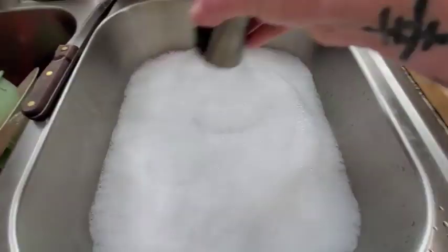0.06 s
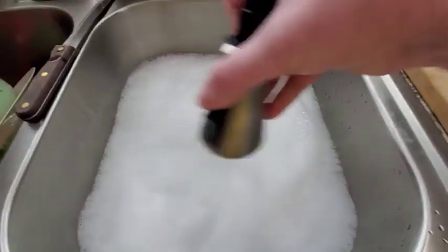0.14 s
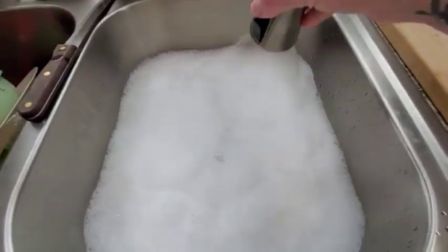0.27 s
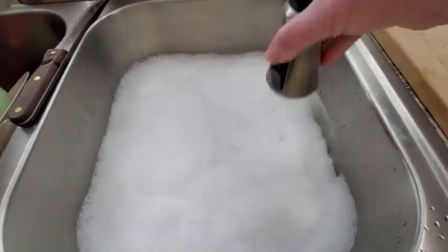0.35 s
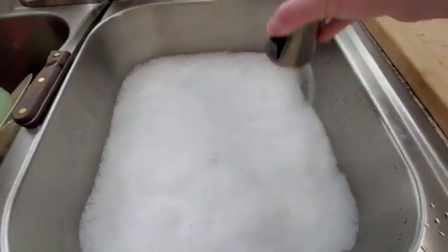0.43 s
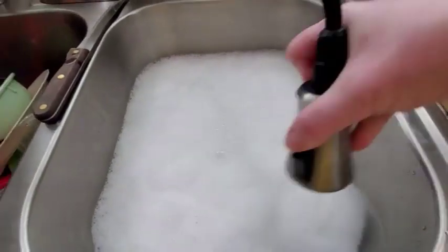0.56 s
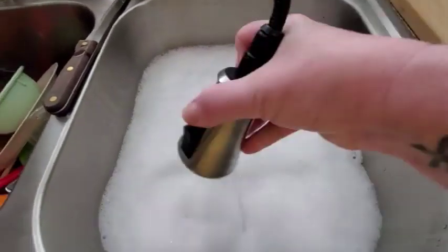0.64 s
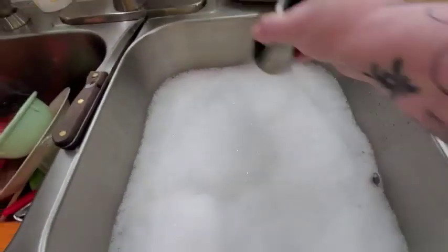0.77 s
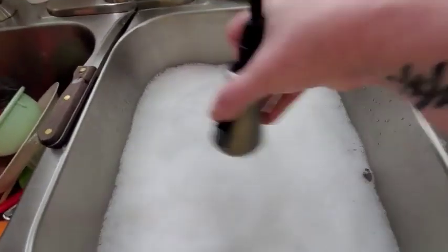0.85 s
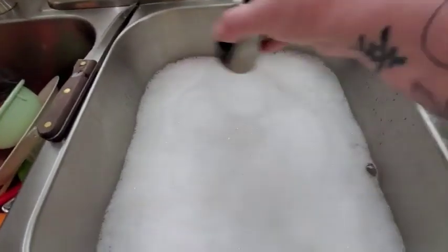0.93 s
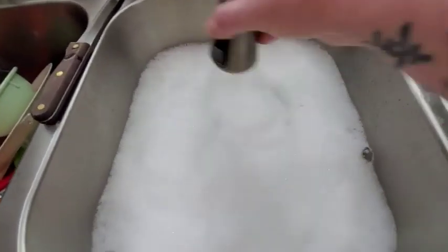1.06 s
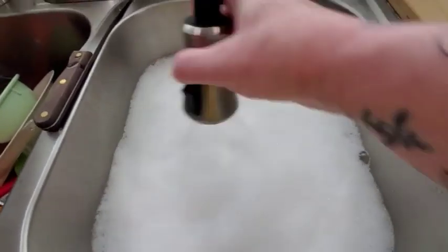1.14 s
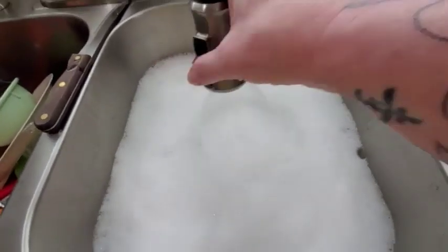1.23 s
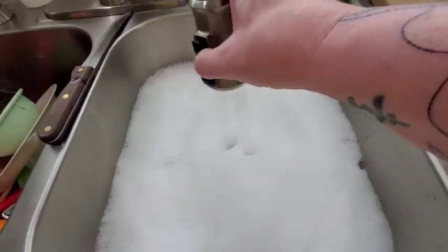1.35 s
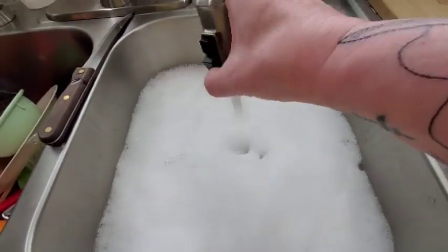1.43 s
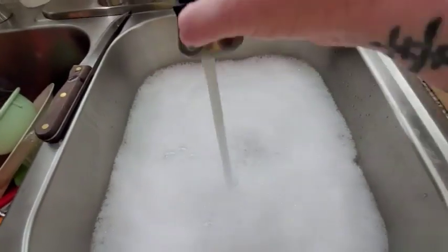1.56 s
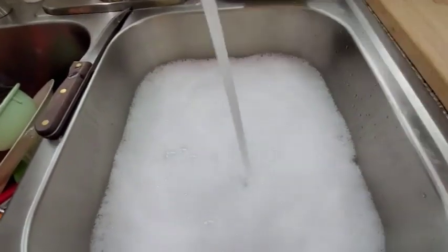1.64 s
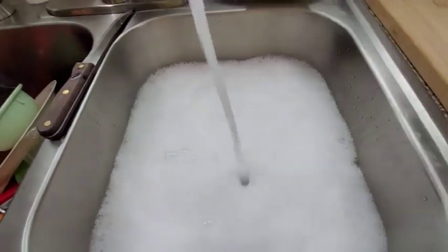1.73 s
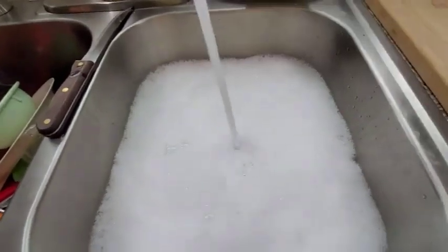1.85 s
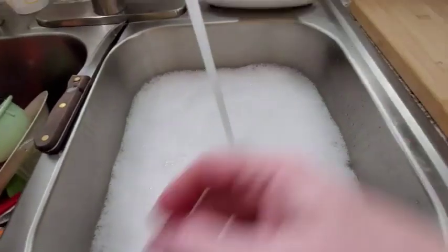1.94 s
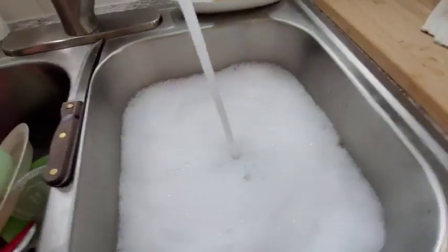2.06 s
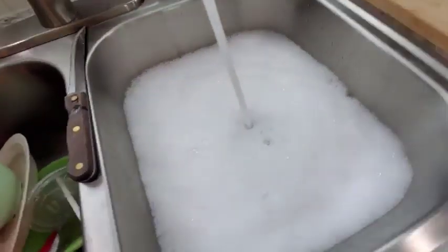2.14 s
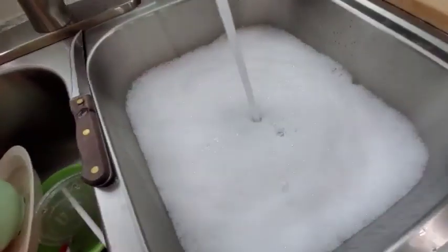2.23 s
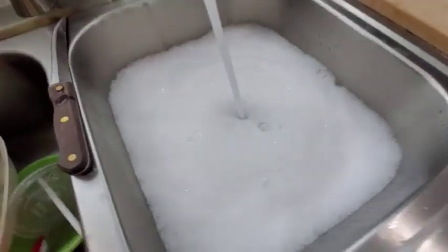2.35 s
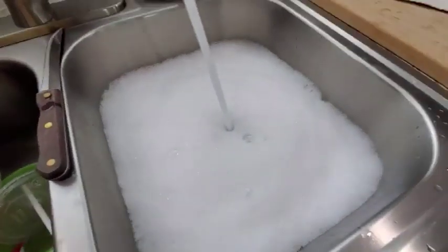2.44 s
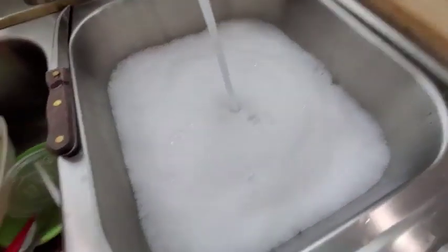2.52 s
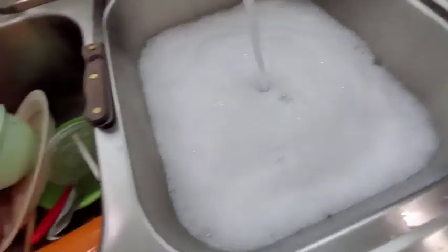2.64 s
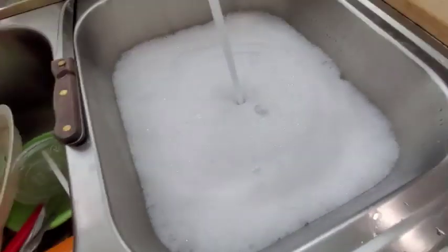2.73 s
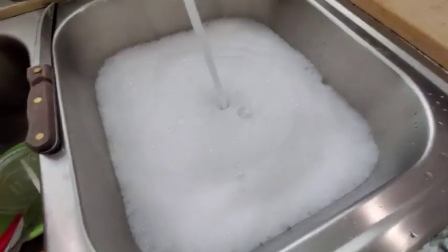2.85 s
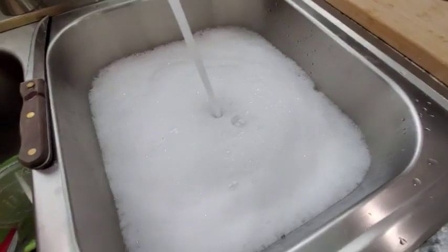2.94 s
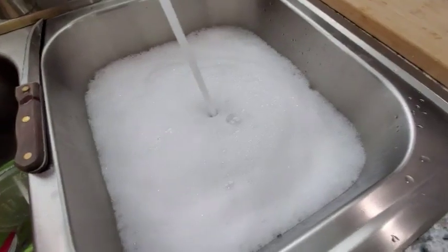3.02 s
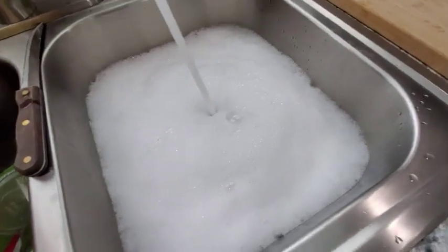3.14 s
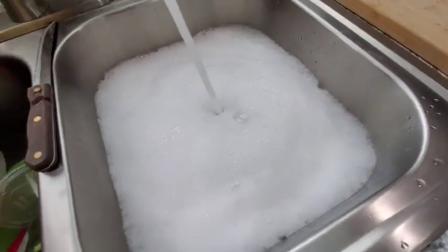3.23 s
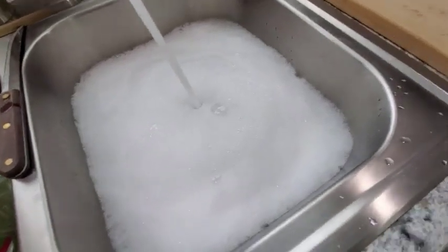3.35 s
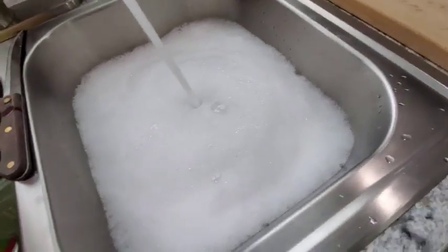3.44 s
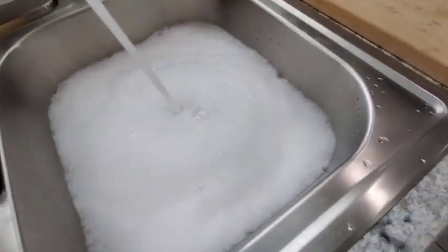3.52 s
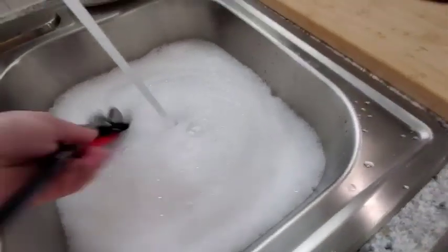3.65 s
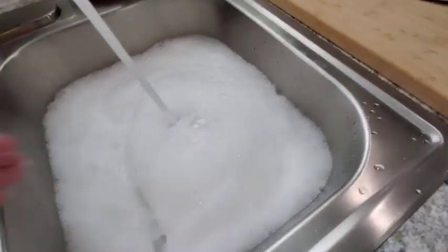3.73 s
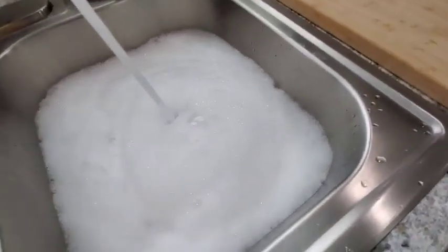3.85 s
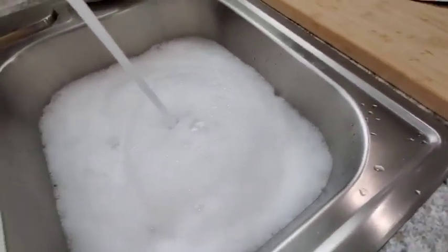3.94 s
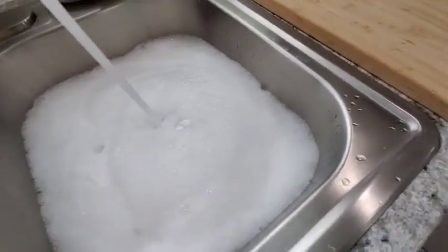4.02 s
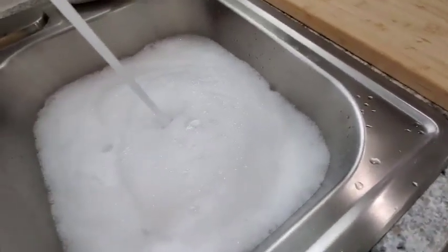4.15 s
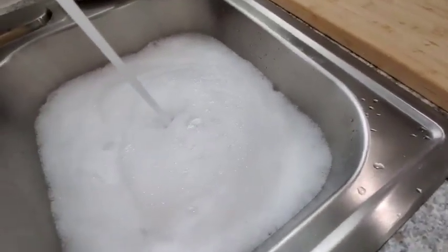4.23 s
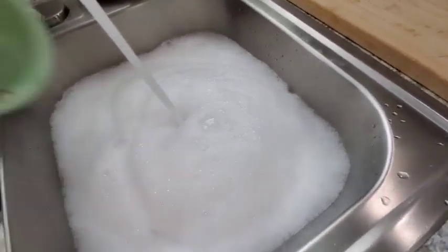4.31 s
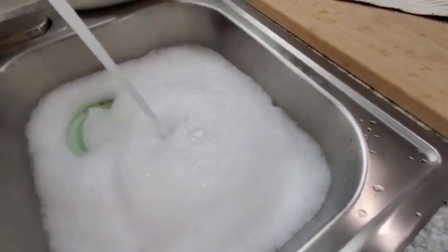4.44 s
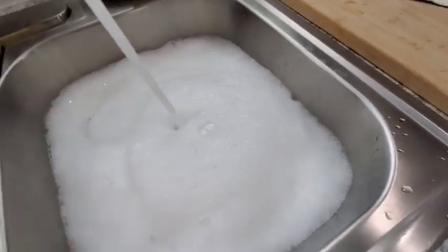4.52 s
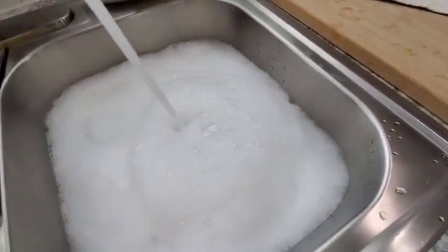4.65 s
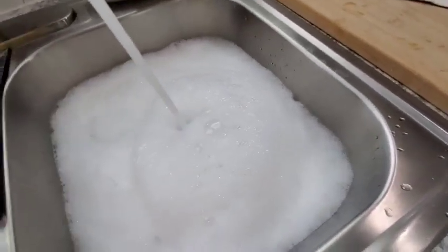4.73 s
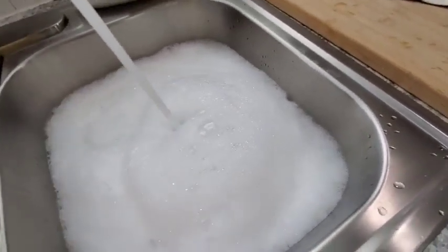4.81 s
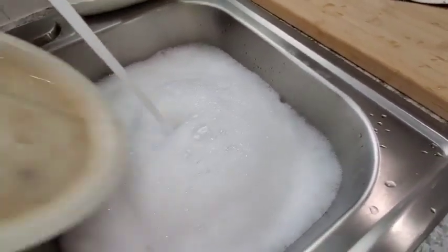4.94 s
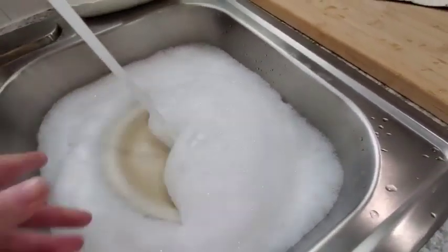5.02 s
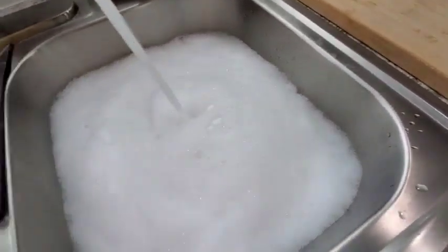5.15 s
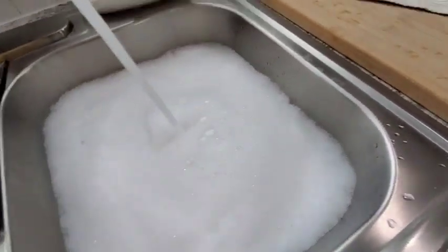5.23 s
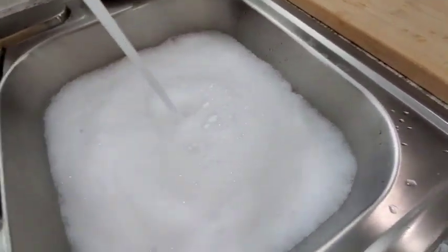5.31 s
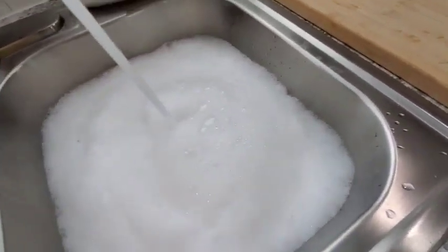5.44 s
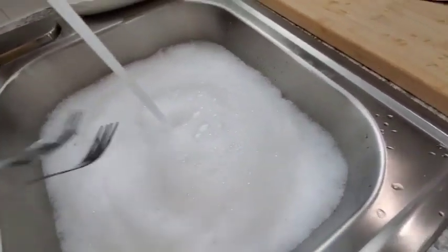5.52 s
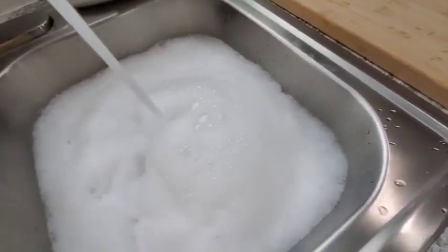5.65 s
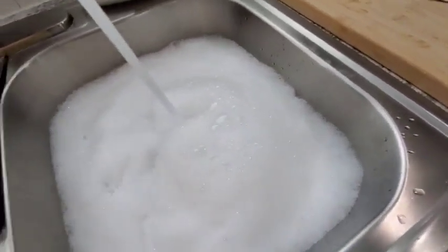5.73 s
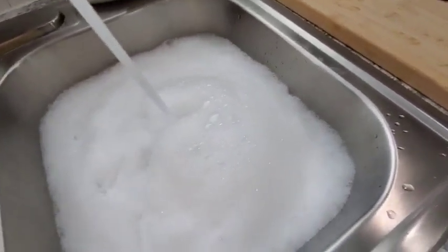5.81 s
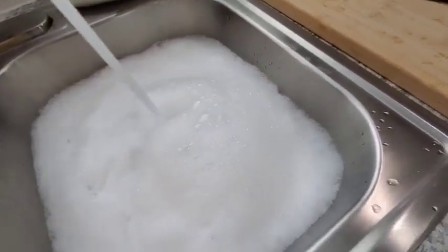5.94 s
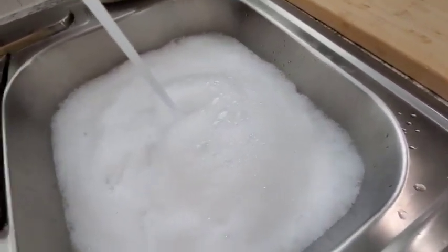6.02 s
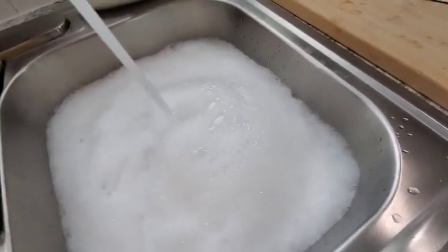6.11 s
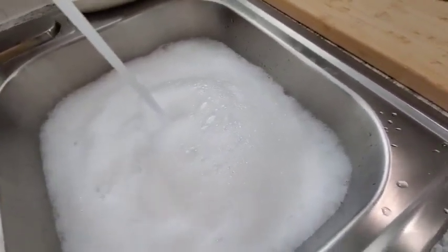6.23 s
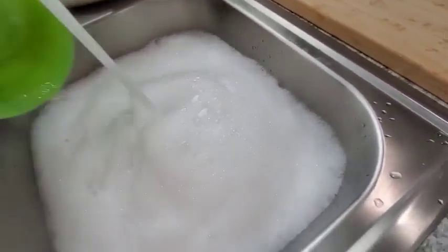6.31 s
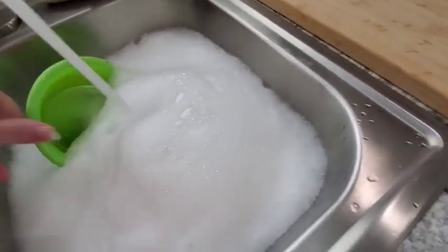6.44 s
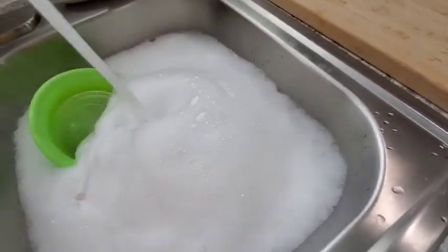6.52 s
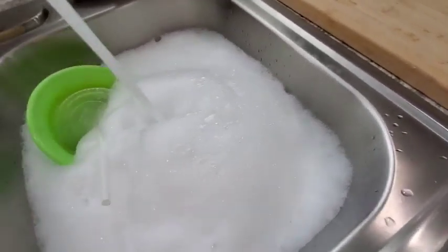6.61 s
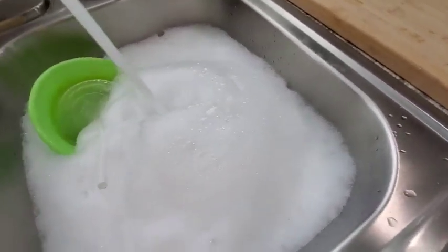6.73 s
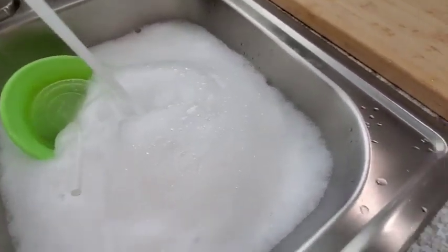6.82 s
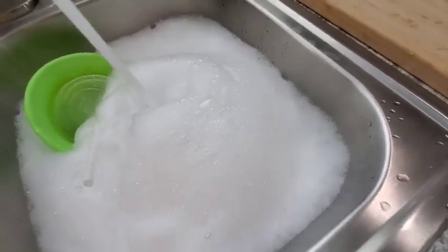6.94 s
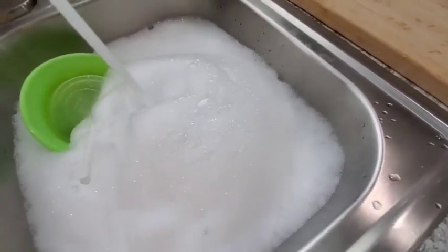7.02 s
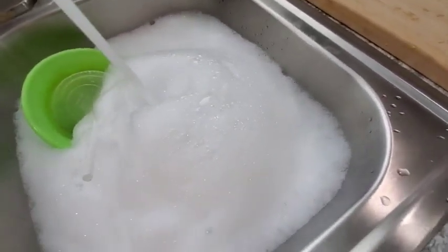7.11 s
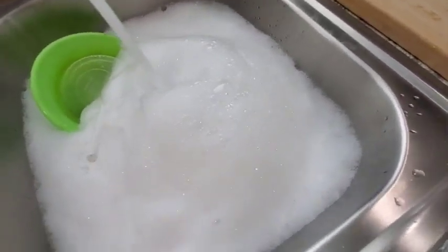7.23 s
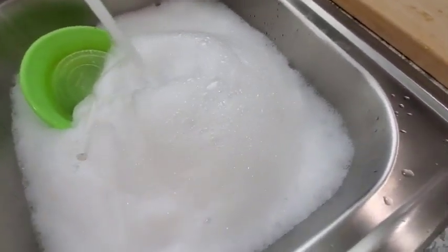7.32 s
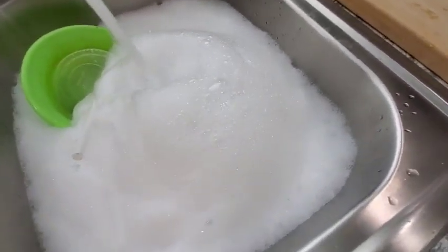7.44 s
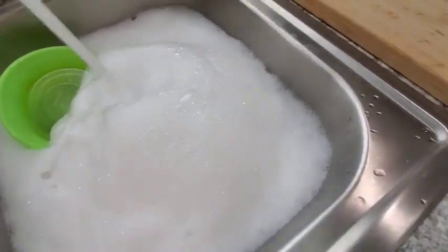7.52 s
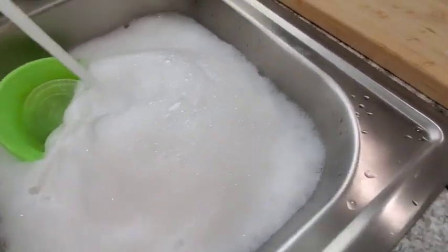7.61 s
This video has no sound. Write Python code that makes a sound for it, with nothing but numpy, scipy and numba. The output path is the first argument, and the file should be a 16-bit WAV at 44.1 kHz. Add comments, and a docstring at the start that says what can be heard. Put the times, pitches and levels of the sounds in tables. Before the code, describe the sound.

Close in a steel kitchen sink, a spray sweeps thick suds with surging hiss and gurgle. The button snaps, the spray head docks with small knocks and a low rumble, and a steady stream hisses and bubbles softly in foam. From about three seconds, dishes clatter, tick and scrape; two heavy hollow thumps come just after five seconds, then lighter plastic-like knocks. A phone held close hears it in stereo.

```python
"""First a spray hisses and gurgles in surges over suds in a steel sink, with a dull plunge under everything.
A button snaps, the spray head docks with a low rumble and a single stream hisses while bubbles ring in foam.
Dishes knock, tick and scrape: knocks are fading tones with a crack, scrapes are trains of tiny clicks.
Coloured noise makes the hisses and the steel bowl hums and booms. A phone close above listens with two ports."""
import sys
import numpy as np
from scipy import signal
from scipy.fft import rfft, irfft, next_fast_len
from scipy.io import wavfile
from scipy.ndimage import uniform_filter1d
from numba import njit

SR = 44100
rng = np.random.default_rng(int(sys.argv[2]) if len(sys.argv) > 2 else 0)


def bounce(signal):
    """Save signal as a 16-bit WAV file at the path given by the first command-line argument."""
    frames = np.transpose(np.atleast_2d(signal))
    limited = np.clip(frames, -1, 1)
    pcm = np.round(limited * 32767).astype(np.int16)
    wavfile.write(sys.argv[1], SR, pcm)


N = 338247

# spray sweeping the foam: (time [s], gurgle level [dB])
SPRAY_LEVEL = [(0, -35.5), (.3, -37.5), (.36, -41.5), (.5, -38.5), (.64, -45.5), (.73, -41), (.78, -32.5),
               (.91, -32), (1.0, -30.5), (1.14, -31.5), (1.26, -31.5), (1.3, -40), (1.42, -39.5),
               (1.6, -57)]
# jets breaking through the foam: (time [s], swell level [dB], bubble pitch [Hz])
JET_SURGES = [(0.053, -25, 750), (0.089, -34, 655), (0.212, -33, 1110), (0.266, -25, 1380),
              (0.298, -28, 880), (0.325, -39, 1500), (0.391, -30.5, 730), (0.448, -33, 900),
              (0.477, -36.5, 1200), (0.512, -39, 700), (0.544, -29.5, 1070), (0.588, -29, 1160),
              (0.734, -42, 1030), (0.803, -29, 1120), (0.851, -24.5, 920), (0.969, -30.5, 820),
              (1.085, -27, 900), (1.19, -31, 982), (1.247, -34, 1000), (1.37, -34, 1100)]
# single stream: (time [s], hiss level [dB], froth level [dB])
STREAM_LEVELS = [(1.4, -41, -35), (1.65, -29.5, -41.5), (3, -30, -43), (3.5, -33.5, -39),
                 (3.58, -34.5, -42), (3.8, -32, -41), (4.6, -32, -43), (4.95, -32, -38.5), (5.06, -35, -44),
                 (5.3, -34, -44), (5.7, -31, -40), (6.7, -31, -43), (7.15, -29, -39.5), (7.67, -30.5, -41)]
# dull dish knocks: (time [s], level [dB], ring pitch [Hz], crack level relative to the knock, before trims [dB])
DISH_KNOCKS = [(1.561, -15, 500, 4.5), (1.747, -13.5, 514, -2), (1.771, -14, 420, 1),
               (1.780, -15.5, 900, -13), (1.824, -16.5, 706, -6), (1.908, -17, 1510, 2.5),
               (3.047, -17, 680, 2), (3.14, -5.5, 1405, -7), (3.154, -6, 1430, -24), (3.254, -10, 630, -11),
               (3.289, -11.5, 1540, 0.5), (3.334, -15, 690, -10), (3.346, -13, 2270, -3),
               (3.351, -9, 1560, -8), (3.362, -18, 1610, -12), (3.46, -11, 794, -22), (3.47, -19, 800, -25),
               (3.701, -17, 2260, -25), (3.761, -20, 690, -4), (3.781, -20.5, 2190, 7),
               (3.796, -19, 2420, 8), (3.801, -13.5, 1370, 1), (3.808, -17, 880, 0),
               (3.909, -13.5, 1624, -8), (4.142, -12, 2250, -13), (4.161, -14, 2270, 1), (4.5, -15, 724, 5),
               (4.689, -17, 714, -14), (4.783, -13.5, 1600, -12), (4.856, -14, 810, -10),
               (4.901, -7.5, 1610, -16), (4.916, -18, 1640, -15), (5.086, -10, 1080, 7),
               (5.113, -5.5, 1410, 3), (5.131, 2, 560, -1), (5.142, 2, 590, -34), (5.166, -15.5, 603, -25),
               (5.234, 2.5, 633, -19), (5.245, -13, 636, -30), (5.282, -6.5, 576, -31),
               (5.606, -6, 695, -18), (5.616, -12, 690, -30), (5.682, -18, 636, 5), (5.688, -11.5, 685, 9),
               (5.693, -13, 2430, 2), (5.702, -8, 624, -9), (5.728, -21.5, 680, 11), (6, -16.5, 945, -29),
               (6.457, -18.5, 303, -4), (6.463, -18, 1240, -8), (6.474, -15, 3150, 1),
               (6.480, -12, 1060, -3), (6.491, -6.5, 1240, -3), (6.495, -9.5, 1040, 1),
               (6.501, -11, 1643, -3), (6.509, -9, 430, -19), (6.532, -7.5, 976, -18),
               (6.539, -13, 1500, -1), (6.571, -11.5, 890, -16), (6.981, -13.5, 1640, -17),
               (7.14, -17, 1460, 3), (7.158, -17, 990, 2), (7.174, -13.5, 875, -5), (7.312, -17, 1470, -2),
               (7.329, -11, 855, 4.5), (7.343, -10, 1317, -3), (7.453, -5, 808, -24),
               (7.455, -14, 1620, -18), (7.486, -15.5, 1640, -25), (7.549, -10.5, 820, -14)]
# bright ticks of cutlery and hard rims: (time [s], level [dB], centre [Hz], time to fall 60 dB [s])
BRIGHT_TICKS = [(1.823, -17, 3900, 0.018), (3.044, -18, 11900, 0.037), (3.1, -20.5, 9400, .035),
                (3.149, -12, 9700, 0.03), (3.2858, -15.5, 10000, .04), (3.333, -21, 11600, .02),
                (3.345, -20, 6100, 0.022), (3.362, -21, 8000, .025), (3.403, -20, 11700, 0.045),
                (3.4333, -18, 11800, 0.027), (3.487, -11, 12400, 0.033), (3.498, -24.5, 4700, 0.053),
                (3.7988, -20.5, 9360, 0.028), (4.143, -17, 4030, 0.036), (4.16, -17.5, 8500, 0.031),
                (4.699, -9.5, 10900, 0.023), (4.7684, -21, 10400, 0.076), (4.83, -21, 10700, 0.044),
                (4.857, -20, 10500, 0.017), (4.865, -16, 8400, .015), (4.888, -14, 9800, 0.047),
                (4.902, -22, 10000, 0.026), (4.912, -18.5, 5030, 0.021), (5.685, -16.5, 9100, 0.031),
                (6.0984, -15.5, 10000, 0.031), (7.31, -13, 8950, 0.031), (7.449, -18.5, 9900, 0.042)]
# scrapes and rumbles: first a low rumble as the spray head docks, then dragged dishes:
# (start [s], length [s], body level [dB], body pitch [Hz], rasp level [dB])
SCRAPES_AND_RUMBLES = [(1.7, 0.21, -43.5, 139, -37.5), (3.053, 0.17, -57, 1320, -32),
                       (3.292, 0.11, -39, 764, -29), (3.413, 0.11, -42, 824, -32.5),
                       (3.484, 0.048, -48, 2270, -35), (3.748, 0.13, -47, 880, -34),
                       (4.101, 0.081, -54, 2100, -28), (4.497, 0.063, -35.5, 1110, -35.5),
                       (4.685, 0.17, -43, 980, -32.5), (4.756, 0.1, -45, 1560, -43),
                       (4.865, 0.082, -50, 1450, -28), (5.668, 0.057, -28.5, 794, -52),
                       (6.013, 0.31, -58, 1110, -34.5), (6.45, 0.088, -34, 1170, -31.5),
                       (6.773, 0.26, -39, 837, -36.5), (7.031, 0.22, -42, 1070, -32),
                       (7.282, 0.092, -37.5, 1040, -55), (7.414, 0.16, -44, 1590, -42)]
# tones in one dish: (multiple of ring pitch [1], level [dB], share of the ring's fade time [1])
DISH_TONES = [(1, 9, 0.12), (1.004, -10, 0.87), (2.198, -6, 0.19), (3.301, -13.5, 0.3)]
# stacked bowls that ring along: (pitch [Hz], level relative to the knock [dB], time to fall 60 dB [s])
PILE_TONES = [(690, -4, 0.017), (1483, -15.5, 0.065), (2234, -18, 0.062), (3320, -32, 0.048)]
# broad hums of the steel bowl: (pitch [Hz], width [Hz], level [dB])
BOWL_HUMS = [(259, 210, -3.5), (632, 23, 2), (1026, 24, -11), (1330, 31, -19)]
# the bowl booms when jets or a dish meet its wall: (time [s], level [dB])
BOWL_BOOMS = [(0.098, -16.5), (0.973, -21), (1.106, -23), (1.155, -25.5), (1.258, -19.5), (3.347, -27),
              (5.135, -17), (5.688, -21.5)]
# reflection off the side of the bowl: (delay [s], level [dB])
BOWL_ECHOES = [(.0043, -12)]
# tone colour of the churned foam: (frequency [Hz], relative level per Hz [dB])
GURGLE_COLOUR = [(150, -16.5), (250, -15), (400, -4), (620, -4), (1000, 2.5), (1500, -3), (2200, -10.5),
                 (3500, -20)]
# tone colour of the fine jets: (frequency [Hz], relative level per Hz [dB])
MIST_COLOUR = [(1800, 7), (3000, -4), (4000, 0.5), (5200, -6.5), (7000, -5.5), (10000, -5), (13000, -7),
               (16000, -10.5)]
# tone colour of the tap's hiss: (frequency [Hz], relative level per Hz [dB])
HISS_COLOUR = [(1500, -13), (2500, -14.5), (3700, -7), (5000, -13), (7000, -5), (9300, 4.5), (10100, 3.5),
               (11300, 6), (12600, -0.5), (16000, 3)]
# tone colour of water plunging under foam: (frequency [Hz], relative level per Hz [dB])
PLUNGE_COLOUR = [(20, -10.5), (60, -17), (100, -9), (180, -5.5), (255, 4), (340, -3.5), (450, 0.5),
                 (800, -18.5), (1500, -13), (3000, -35)]
# tone colour of the stream's bubbles: (frequency [Hz], relative level per Hz [dB])
FROTH_COLOUR = [(400, -7.5), (630, 5), (800, 1.5), (1050, 4), (1350, -2), (1900, -2), (2800, -12.5)]
# tone colour of the scraping clicks: (frequency [Hz], relative level per Hz [dB])
RASP_COLOUR = [(1500, 12), (3000, 4), (5500, 5.5), (9000, 8.5), (13000, 6.5), (16000, -6)]
# tone colour of the spray button: (frequency [Hz], relative level per Hz [dB])
SWITCH_COLOUR = [(2600, -23), (3900, -2), (5000, -15), (16000, -16)]
# opposite-phase part at the two ports: (frequency [Hz], level added to the side signal [dB])
PORT_COLOUR = [(60, -19), (110, -11), (200, -23), (380, -16), (700, -12.5), (1290, -6), (2380, 0),
               (4400, 5), (8120, -6), (11000, -11), (15000, -4)]
# where things are heard: (time [s], water left minus right [dB], dishes left minus right [dB])
PLACES = [(0, -1, -1), (1.3, -1, -1), (3, 1.5, 4), (4.6, 2, 2), (5.1, 0.5, 3), (7.1, 2, 2.5),
          (7.67, 2, 6.5)]

MIST_DB, RUMBLE_DB = -34, -19  # mist of the jets; rumble relative to the gurgle
PLUNGE_DB, MUFFLE_DB_PER_S = -42, -0.21  # the plunge grows fainter as the basin fills
# a sunken dish sounds hollow under the stream; its pitch sinks as it fills with foam
HOLLOW_S, HOLLOW_DB = 5.33, 2
HOLLOW_HZ, HOLLOW_END_HZ, HOLLOW_WIDTH_HZ = 1090, 865, 186
CUP_S, CUP_DB = 6.45, -7  # water spilling off a cup plops into the foam
BOOM_RISE_S, BOOM_S = 0.005, 0.019  # rise time; time scale of the bell-shaped fade
KNOCK_DELAY_S = .0012  # each knock starts this long after its listed time
KNOCK_T60_S, KNOCK_BOOM_DB = 0.036, -27.5  # ring's full fade time; bowl boom relative to each knock
PILE_START_S, PILE_END_S = 3.0, 4.97  # while the stack is handled
SWITCH_S, SWITCH_DB, SWITCH_T60_S = 1.3986, -14, 0.008  # the spray button snaps over
BASS_HZ, TOP_HZ = 25, 15750  # limits of the phone


def undb(db):
    """Turn decibels into a plain multiplier."""
    return 10 ** (np.asarray(db) / 20)


def unit(x):
    """Bring a sound to an average (RMS) strength of 1."""
    return x / np.sqrt(np.mean(x ** 2))


def curve(table):
    """Join the columns of a table in time by straight lines."""
    s, *columns = np.transpose(table)
    return [np.interp(np.arange(N) / SR, s, c) for c in columns]


def shape_db(spectrum, hz):
    """Read a tone colour at any frequency, with straight lines on a pitch scale."""
    points_hz, points_db = np.array(spectrum).T
    return np.interp(np.log(hz), np.log(points_hz), points_db)


def colour(x, spectrum):
    """Weight the frequencies of a sound by a tone colour."""
    size = next_fast_len(N)
    hz = np.arange(1, size // 2 + 2) * SR / size
    return irfft(rfft(x, size) * undb(shape_db(spectrum, hz)), size)[..., :N]


def band(x, hz, width):
    """Resonance with gain 1 at its centre."""
    return signal.lfilter(*signal.iirpeak(hz, hz / width, SR), x)


def double_band(x, hz, width):
    """The same resonance twice in a row, for steeper sides."""
    return band(band(x, hz, width), hz, width)


def walk(rate):
    """Random levels, new at this rate per second, smoothed twice, without slow drift; spread 1."""
    hold = int(SR / rate)
    steps = np.repeat(rng.standard_normal(N // hold + 1), hold)
    x = uniform_filter1d(uniform_filter1d(steps, hold), hold)[:N]
    return unit(x - uniform_filter1d(x, 6 * hold))


def add(out, s, x):
    """Lay a short sound into the scene."""
    i = int(s * SR)
    out[i:i + len(x)] += x[:N - i]


def pan(mid, side, pan_db):
    """Left and right ports: a placed sound plus a part that arrives in opposite phase."""
    sign = np.array([[1], [-1]])
    return (mid + sign * colour(side, PORT_COLOUR)) * undb(sign * pan_db / 2)


def walls(x, t60):
    """A short dense scatter off the pile and the steel: noise that fades 60 dB in t60 seconds."""
    age = np.arange(int(t60 * SR)) / SR
    tail = rng.standard_normal(len(age)) * undb(-60 * age / t60)
    return signal.fftconvolve(x, tail / np.sqrt(np.sum(tail ** 2)))[:N]


def basin(x):
    """The steel bowl hums at a few broad pitches, as loud as what drives it."""
    hum = sum(undb(db) * band(x, hz, width) for hz, width, db in BOWL_HUMS)
    return unit(hum) * np.std(x)


def boom(age, db):
    """The lowest hum of the bowl swells quickly and dies."""
    envelope = np.clip(age / BOOM_RISE_S, 0, 1) * np.exp(-(age / BOOM_S) ** 2)
    return undb(db) * envelope * np.sin(2 * np.pi * BOWL_HUMS[0][0] * age)


@njit
def ring(start, hz, cycles, size, glide, length, rate):
    """Each bubble is a tone that swells, fades and rises in pitch."""
    y = np.zeros(length)
    for k in range(len(start)):
        life = cycles[k] * rate / hz[k]
        step, phase = 2 * np.pi * hz[k] / rate, 0.
        for i in range(min(int(5 * life), length - start[k])):
            phase += step * (1 + glide * i / life)
            y[start[k] + i] += size[k] * (np.exp(-i / life) - np.exp(-5 * i / life)) * np.sin(phase)
    return y


def bubbles(count, length, spectrum, cycles, scatter_db, glide):
    """A cloud of bubbles of all sizes over the first samples; a few are much louder than the rest."""
    place, pitch, life, loud = rng.random((count, 4)).T
    lo, hi = spectrum[0][0], spectrum[-1][0]
    hz = lo * (hi / lo) ** pitch
    # equal numbers per octave and equal cycles: energy per Hz falls 6 dB an octave, so size grows with pitch
    size = hz * undb(shape_db(spectrum, hz) - scatter_db * np.log(.02 + loud))
    start = (place * length).astype(np.int64)
    cloud = ring(start, hz, cycles * (.5 + life), size, glide, length, 1. * SR)
    return np.pad(unit(cloud), (0, N - length))


def flicker(spectrum, shared_db, own_db, drops_db):
    """Noise in narrow strips that swell together and flicker alone, with droplets ticking in it."""
    drop_db = drops_db * np.minimum(rng.exponential(size=N), 5)
    drops = unit(rng.standard_normal(N) * undb(drop_db) * (rng.random(N) < .03))
    x = colour(rng.standard_normal(N) + .4 * drops, spectrum)
    swell = walk(16)
    strips_hz = 1500 * 2 ** np.arange(0, 3.5, 1 / 5)
    return unit(sum(band(x, hz, hz / 5) * undb(shared_db * swell + own_db * walk(35)) for hz in strips_hz))


def hollow_dish(pour, t):
    """A sunken dish resonates under the stream, fading over to a lower pitch as it fills with foam."""
    sunk = np.clip((t - HOLLOW_S) / (t[-1] - HOLLOW_S), 0, 1)
    early = np.sqrt(1 - sunk) * band(pour, HOLLOW_HZ, HOLLOW_WIDTH_HZ)
    late = np.sqrt(sunk) * band(pour, HOLLOW_END_HZ, HOLLOW_WIDTH_HZ)
    return undb(HOLLOW_DB) * np.clip((t - HOLLOW_S) / 0.019, 0, 1) * (early + late)


def cup_spill():
    """Water spilling off a cup frees extra bubbles that plop from then on."""
    start = int(CUP_S * SR)
    plops = bubbles(count=200, length=N - start, spectrum=FROTH_COLOUR, cycles=7.0, scatter_db=3.5, glide=0.12)
    return undb(CUP_DB) * np.roll(plops, start)


def stream():
    """Air and water hiss at the tap and free ringing bubbles; a dull plunge under the foam runs throughout."""
    hiss_db, froth_db = curve(STREAM_LEVELS)
    t = np.arange(N) / SR
    on = np.clip((t - 1.41) / 0.13, 0, 1)
    hiss = flicker(HISS_COLOUR, shared_db=1.0, own_db=2.8, drops_db=4.5)
    plunge = unit(colour(rng.standard_normal(N), PLUNGE_COLOUR)) * undb(0.98 * walk(26))
    froth = bubbles(count=10000, length=N, spectrum=FROTH_COLOUR, cycles=5.1, scatter_db=3.0, glide=0.073)
    froth = unit(undb(1.3 * walk(40)) * froth + undb(-17.0) * basin(froth))
    pour = froth + unit(colour(rng.standard_normal(N), FROTH_COLOUR))
    froth = froth + hollow_dish(pour, t) + cup_spill()
    flow = on * (hiss * undb(hiss_db) + froth * undb(froth_db))
    return flow + plunge * undb(PLUNGE_DB + MUFFLE_DB_PER_S * t)


def spray():
    """Many fine jets churn the foam into bubbles and shake the bowl; where they break through, it surges."""
    gurgle_db, = curve(SPRAY_LEVEL)
    t = np.arange(N) / SR
    on = np.clip((1.58 - t) / 0.048, 0, 1)
    churn = bubbles(count=5000, length=2 * SR, spectrum=GURGLE_COLOUR, cycles=3.3, scatter_db=2.0, glide=0.06)
    churn = unit(undb(1.5 * walk(30.56)) * churn)  # the foam gives way in clumps
    churn = churn + undb(-6) * basin(churn)
    mist = flicker(MIST_COLOUR, shared_db=1.2, own_db=2.4, drops_db=2.5)
    rumble = unit(band(rng.standard_normal(N), 70, 120)) * undb(RUMBLE_DB + 4 * walk(12))
    out = undb(gurgle_db) * (churn + rumble) + undb(MIST_DB) * mist
    for s, db, hz in JET_SURGES:
        span = slice(int(s * SR), int((s + .07) * SR))
        age = t[span] - s
        swell = undb(db) * np.clip(age / 0.0026, 0, 1) * np.exp(-(age / 0.03) ** 4)
        pitched = unit(band(churn[span], hz, 0.11 * hz))
        out[span] += swell * (0.81 * unit(churn[span]) + 0.63 * pitched + undb(-15.0) * mist[span])
    return out * on


def switch_snap(age):
    """The spray button snaps over: a very short burst of coloured noise."""
    burst = unit(colour(rng.standard_normal(N), SWITCH_COLOUR)[:len(age)])
    return undb(SWITCH_DB - 60 * age / SWITCH_T60_S) * burst


def knock(age, hz, crack_db, pile_rings, noise, detune):
    """A struck dish rings at its own pitches, rattles and cracks; the bowl booms below."""
    fall_db = -60 * age / KNOCK_T60_S
    x = np.zeros(len(age))
    for (multiple, db, share), d in zip(DISH_TONES, detune):
        tone_hz = hz * multiple * (1 + 0.039 * d * (multiple > 1))  # only the upper tones stray
        x += undb(db + fall_db / share) * np.sin(2 * np.pi * tone_hz * age)
    x += undb(-20 - 60 * age / 0.05) * unit(double_band(noise, hz, 0.6 * hz))  # the dish rattles as it settles
    if pile_rings:
        for (tone_hz, db, t60), d in zip(PILE_TONES, detune[::-1]):
            tone = np.sin(2 * np.pi * tone_hz * (1 + 0.015 * d) * age)
            x += undb(db + 0.67 * d - 60 * age / t60) * tone
    x = x * (1 - np.exp(-age / 0.0015))  # the knock swells in over about 1.5 ms
    x += undb(crack_db + 5.0 - 60 * age / 0.0012) * np.sin(2 * np.pi * 2200 * age)  # the first contact snaps
    crack = unit(band(band(noise, 1800, 3500), 2000, 4500))
    x += undb(crack_db - 15 - 60 * age / 0.016) * crack
    return x + boom(age, KNOCK_BOOM_DB)


def tick(age, db, hz, t60, noise):
    """Hard rims touch: a narrow and a wide band of noise rise softly and die away."""
    x = unit(band(noise, hz, 0.18 * hz)) + 0.71 * unit(band(noise, hz, 1.16 * hz))
    return undb(db - 60 * age / t60) * (1 - np.exp(-age / 0.0035)) * x


def add_scrapes_and_rumbles(out):
    """Stick-slip: a dense uneven train of tiny clicks drives a resonant body and a bright rasp."""
    slips = unit(rng.standard_normal(N) * undb(3 * walk(300) + 1.2 * rng.exponential(size=N)))
    grit = colour(slips, RASP_COLOUR)
    rings_hz = 1500 * 2 ** np.arange(0, 3.4, 1 / 4)
    rasp = unit(sum(band(grit, hz, hz / 14) * undb(4.5 * walk(90)) for hz in rings_hz))  # rings come and go
    for s, length, body_db, hz, rasp_db in SCRAPES_AND_RUMBLES:
        span = slice(int(s * SR), int((s + length) * SR))
        hum = unit(band(slips[span], hz, .06 * hz))
        body = 1.3 * hum + unit(double_band(slips[span], hz, 1.6 * hz))
        add(out, s, np.hanning(len(body)) ** 0.52 * (undb(body_db) * body + undb(rasp_db) * rasp[span]))


def dishes():
    """Knocks, booms, ticks, the button's snap, the docking rumble and scrapes, with an echo off the bowl."""
    out, age = np.zeros(N), np.arange(int(.2 * SR)) / SR
    chance = rng.standard_normal((len(DISH_KNOCKS), 2, len(age)))
    for (s, db, hz, crack_db), (noise, detune) in zip(DISH_KNOCKS, chance):
        pile_rings = PILE_START_S < s < PILE_END_S
        add(out, s + KNOCK_DELAY_S, undb(db) * knock(age, hz, crack_db, pile_rings, noise, detune))
    for s, db in BOWL_BOOMS:
        add(out, s, boom(age, db))
    for (s, db, hz, t60), noise in zip(BRIGHT_TICKS, rng.standard_normal((len(BRIGHT_TICKS), len(age)))):
        add(out, s, tick(age, db, hz, t60, noise))
    add(out, SWITCH_S, switch_snap(age))
    add_scrapes_and_rumbles(out)
    direct = band(out, 1340, 5900)  # foam soaks up the treble on the way
    for s, db in BOWL_ECHOES:
        add(out, s, undb(db) * direct)
    return out


def scene():
    """Water is wide, with other bubbles in the opposite-phase part; dishes reach it a quarter cycle off."""
    water_db, dish_db = curve(PLACES)
    high_pass = signal.butter(2, 150, "high", fs=SR, output="sos")
    hits = signal.sosfilt(high_pass, dishes())  # small things make no deep bass
    late = signal.hilbert(hits, next_fast_len(N))[:N].imag  # a quarter cycle out of step
    water = pan(spray() + stream(), spray() + stream(), water_db)  # each call draws other bubbles
    hits_side = undb(2.5) * walls(hits, 0.091) - undb(-1.5) * late
    return water + pan(hits, hits_side, dish_db)


def record(dry):
    """The phone drops the deepest bass, rounds the loudest peaks and cuts the top."""
    thin = signal.sosfilt(signal.butter(1, BASS_HZ, "high", fs=SR, output="sos"), dry)
    rounded = 1.3 * np.tanh(thin / 1.3)
    return signal.sosfilt(signal.ellip(10, .2, 70, TOP_HZ, fs=SR, output="sos"), rounded)


dry = scene()
out = record(dry)
bounce(out)
```